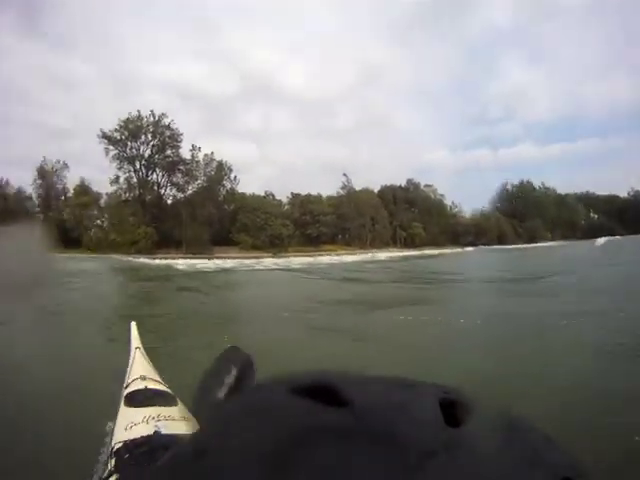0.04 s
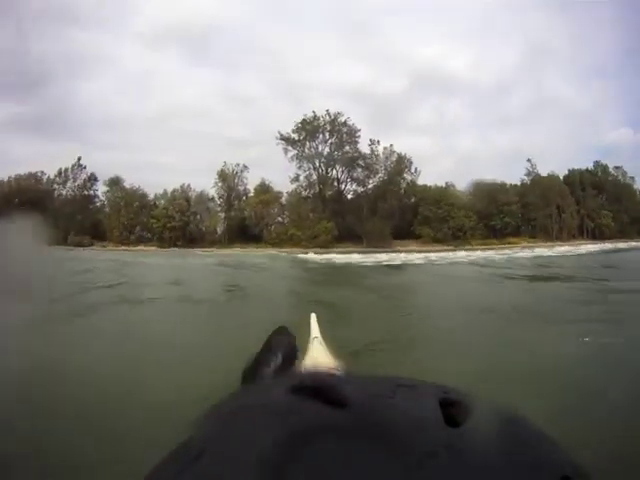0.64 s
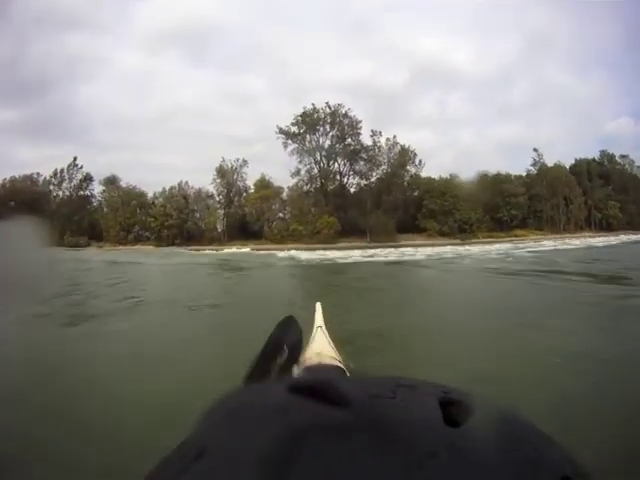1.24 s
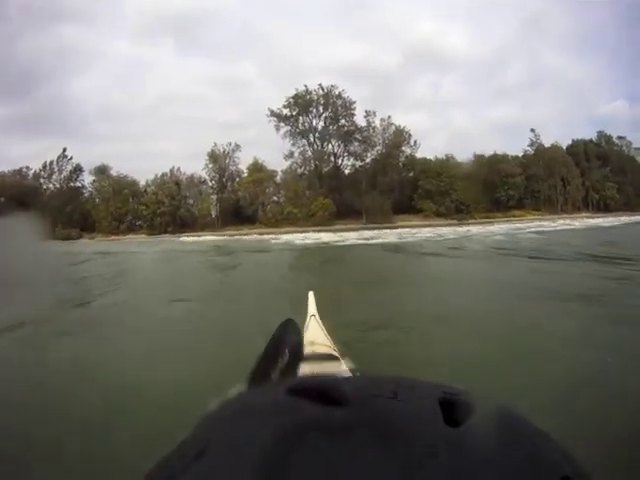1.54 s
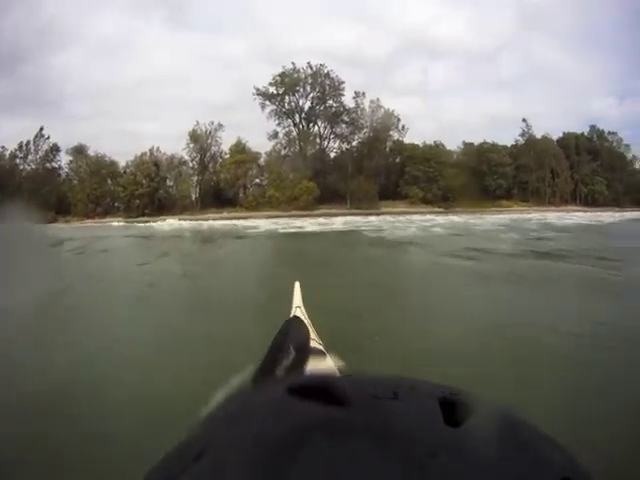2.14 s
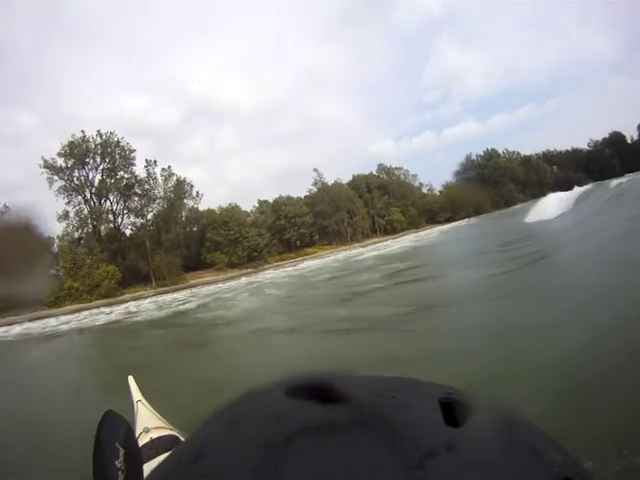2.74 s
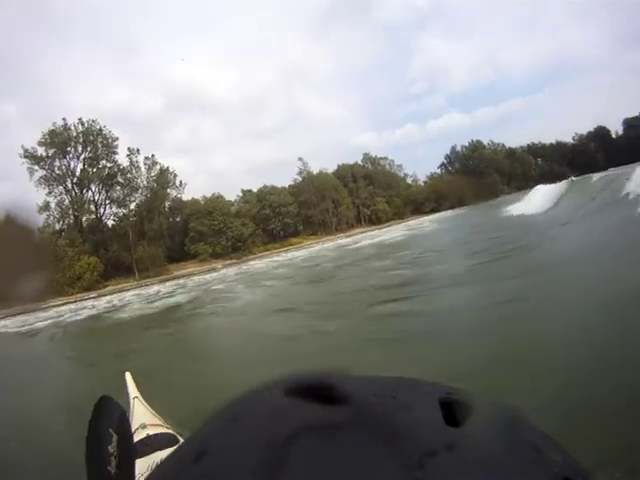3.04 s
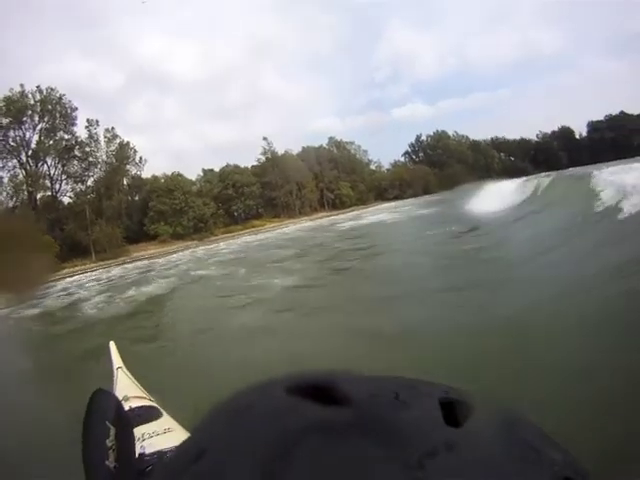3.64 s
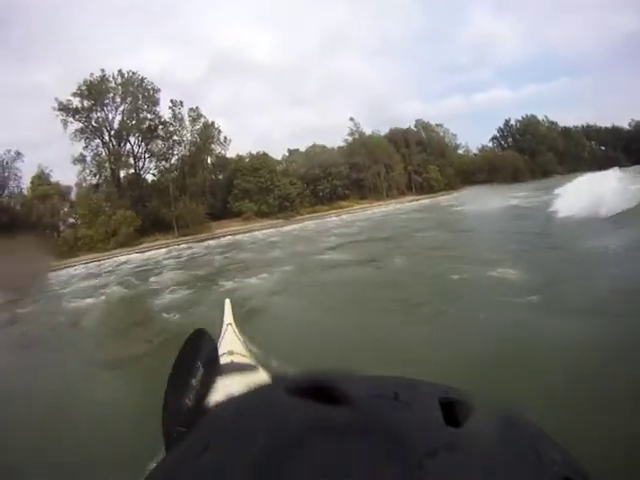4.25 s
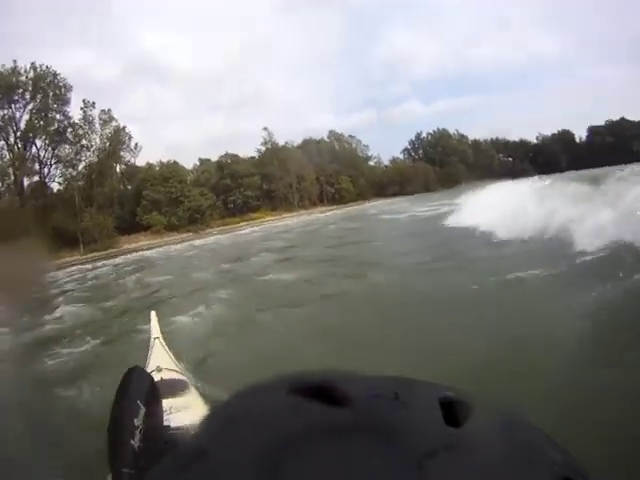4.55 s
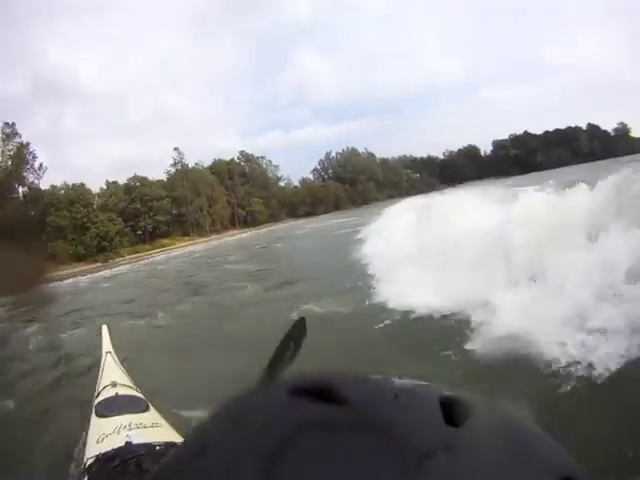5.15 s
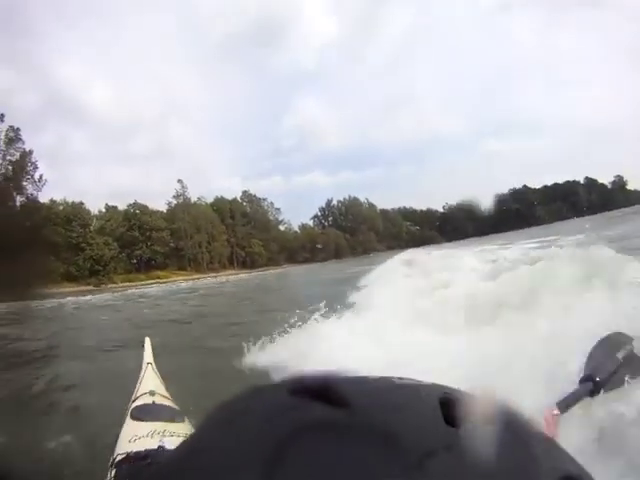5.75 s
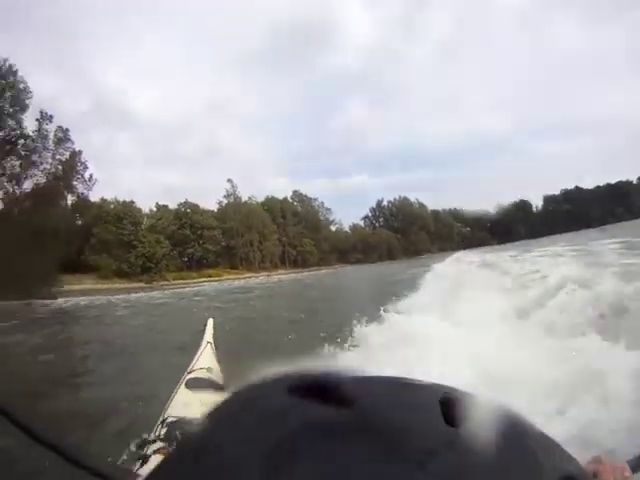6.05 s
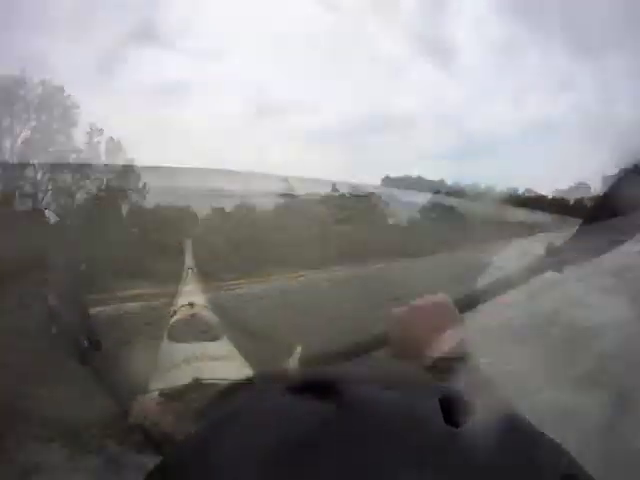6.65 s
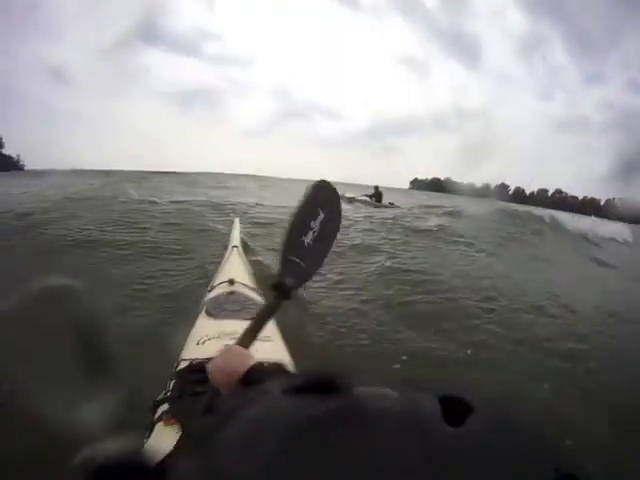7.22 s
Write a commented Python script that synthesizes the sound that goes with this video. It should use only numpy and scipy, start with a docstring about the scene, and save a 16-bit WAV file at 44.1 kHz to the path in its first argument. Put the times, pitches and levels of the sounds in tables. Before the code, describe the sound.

From a cased microphone on a paddler's helmet, lake water hisses and gurgles around a kayak while drops spatter on the shell and gear clacks lightly. The boxy, glassy rush swells steadily and is loudest as a wave breaks beside the boat. Low gusts thump the microphone and a hard knock follows, then the foam turns quieter and duller, with a few last splashes.

```python
"""Kayak surfing to a lake shore

A windy lake, a wave breaking alongside; the microphone rides in a waterproof case on the paddler's
helmet. Foam and spray rush through the resonances of the case, the breaker roars underneath and wind
buffets the mount. Right at the microphone, splashes patter on the shell and gear knocks a few times.
The camera samples coarsely and holds each value, mirroring it all into a thin, glassy treble."""
import sys
import numpy as np
from scipy import signal
from scipy.fft import rfft, irfft
from scipy.io import wavfile
from scipy.ndimage import uniform_filter1d

SR = 44100
rng = np.random.default_rng(int(sys.argv[2]) if len(sys.argv) > 2 else 0)


def persist_wave(psi):
    """Save psi, clipped to +-1, as 16-bit WAV."""
    counts = np.round(np.clip(psi, -1, 1) * 32767).astype(np.int16)
    wavfile.write(sys.argv[1], SR, np.atleast_2d(counts).T)


N = 321048
TIME = np.arange(N) / SR
FREQ = np.arange(N // 2 + 1) * SR / N

# what the case wall lets through to the microphone: frequency_hz, gain_db
CASE_WALL = [(100, -17), (180, -15.5), (400, -16), (750, -20), (1100, -16.5), (2000, -12), (3500, -14.5),
             (5300, -17.5), (6000, -26)]
# resonances and notches of the case: centre_hz, width_hz, gain_db
CASE_RESONANCES = [(949, 130, 8), (1205, 190, 7.5), (1497, 370, 4), (2250, 730, 14), (2243, 73, 1.5),
                   (2737, 71, 5.5), (2832, 210, -6.5), (3237, 120, 6), (3697, 370, 5.5), (4350, 310, -1.5),
                   (4990, 360, 4)]
# the wave builds, breaks alongside and drops behind; 0 dB is the steady ride: time_s, level_db
SURF_STRENGTH = [(0, -6), (.6, -5), (1.1, -4.5), (1.6, -5.5), (2.08, -6), (2.36, -3), (2.8, -0.6),
                 (3.35, .2), (3.75, -0.54), (4.5, 1), (5, 2.1), (5.32, 6), (5.44, 4), (5.6, 7.6),
                 (6.24, 5.5), (6.63, 1.7), (6.88, -4.5), (7.28, -2)]
# gusts on the case: peak_s, length_s, level_db
GUSTS = [(.3, 1, -55), (.84, 0.22, -50), (2.7, 1.0, -51), (3.42, .16, -50), (5.4, 0.38, -46),
         (5.78, 0.28, -43.5), (6.0, 0.28, -44), (6.3, 0.46, -38), (6.9, 0.29, -45.5), (7.2, 0.26, -44)]
# single eddies that shove the case as the wave passes: start_s, peak_db, length_s
BUFFETS = [(6.186, -32, 0.024), (6.282, -25, 0.019), (6.364, -33, 0.029)]
# water slopping against the boat: peak_s, length_s, level_db, pitch_hz
SLOSHES = [(.52, 0.12, -58, 320), (.8, 0.19, -56, 290), (1.04, 0.44, -48, 3800), (1.307, 0.14, -46, 1400),
           (2.594, .08, -56, 150), (2.687, 0.084, -55, 400), (5.36, 0.25, -37.5, 1140),
           (6.08, .36, -39.5, 1250), (7.143, 0.62, -53.5, 145)]
# knocks of the gear: start_s, clack_gain_db, thump_gain_db, contact_s
KNOCKS = [(0.3261, -20.5, -50, .003), (0.333, -36, -35.5, 0.0057), (0.354, -29, -40, 0.008),
          (.6545, -28, -40, 0.0052), (6.481, -28, -19.5, 0.0029)]
# modes of the hard shell: pitch_hz, relative_db, t60_s
SHELL_MODES = [(450, -15, .04), (1060, -11, 0.043), (1280, 4, .028), (1346, 14, 0.021), (1950, -5, .015)]
# modes of the springy mount: pitch_hz, relative_db, t60_s
MOUNT_MODES = [(50.6, 18.5, 0.15), (138, 6, 0.13), (216, -17, 0.05), (302, -11, 0.052), (520, -1.5, 0.11)]
# larger splashes landing on the case: start_s, peak_db, decay_s, brightness_db
SPLASHES = [(.044, -29, 0.0078, -1), (.166, -27.5, 0.0074, -16), (.789, -32, .005, -4),
            (.861, -27, 0.0065, 1), (1.509, -30, 0.011, 8), (2.2445, -25.5, .005, -14),
            (3.264, -27, .004, 10), (4.423, -22, 0.011, -3), (5.185, -27, .005, -8), (5.331, -22, 0.004, 2),
            (5.338, -18, 0.0054, -18), (5.682, -21, .0055, -6), (6.481, -23, .006, -11),
            (6.653, -30, .004, -10), (7.079, -27, 0.0096, -15), (7.123, -25.5, 0.01, -7),
            (7.229, -36, .008, -15)]
# sheets of spray sweeping over the case: peak_s, length_s, level_db
SPRAYS = [(0.856, .26, -43), (2.92, 0.55, -42.5), (4.42, 0.24, -40.5), (5.187, 0.41, -36),
          (7.102, 0.13, -42)]

# the paddler's head turns from the wave, shading its fizz and roar from the microphone
TURN_START_S, TURN_LENGTH_S, FIZZ_SHADE_DB, ROAR_SHADE_DB = 6.7, 0.31, -7.5, -2.5
# fine foam fizzes on after each sheet of spray; lag and level are relative to the sheet
AFTERFIZZ_LAG_S, AFTERFIZZ_S, AFTERFIZZ_DB = 0.19, 0.54, -8.5
CAMERA_RATE_HZ, TREBLE_LIMIT_HZ = 12000, 15280


def undb(db):
    """Decibels to gain."""
    return 10 ** (np.asarray(db) / 20)


def unit(x):
    """Scale to rms 1."""
    return x / np.sqrt(np.mean(x ** 2))


def add(out, start_s, sound):
    """Mix a short sound in at start_s."""
    start = max(int(start_s * SR), 0)
    out[start:start + len(sound)] += sound[:max(N - start, 0)]


def below(hz, order):
    """Share of the power that a low-pass lets through at each frequency."""
    return 1 / (1 + (FREQ / hz) ** (2 * order))


def shaped(x, response):
    """Filter by a frequency response."""
    return irfft(rfft(x) * response, N)


def ramp(start_s, length_s):
    """Rises from 0 to 1 over length_s."""
    return np.clip((TIME - start_s) / length_s, 0, 1)


def swell_power(rows):
    """Power of rounded swells that rise and die away around their peaks."""
    return sum((undb(db) * np.sin(np.pi * ramp(peak_s - length_s / 2, length_s))) ** 2
               for peak_s, length_s, db in rows)


def wander(rate_hz):
    """Glides to a new random value rate_hz times a second; rms 1."""
    hold = int(SR / rate_hz)
    steps = np.repeat(rng.standard_normal(N // hold + 1), hold)
    return unit(uniform_filter1d(steps, hold)[:N])


def follow_surf(ride_db, growth):
    """Gain that is ride_db on the steady ride and rises by growth dB per dB of surf."""
    surf_db = np.interp(TIME, *np.transpose(SURF_STRENGTH))
    return undb(ride_db + growth * surf_db)


def case_response():
    """The wall and resonances around the microphone, made causal so a drop rings after it lands."""
    wall_hz, wall_db = np.transpose(CASE_WALL)
    db = np.interp(np.log(FREQ + 1), np.log(wall_hz), wall_db)
    db += sum(gain / (1 + (2 * (FREQ - centre) / width) ** 2) for centre, width, gain in CASE_RESONANCES)
    cepstrum = irfft(np.log(undb(db)), N)
    causal_fold = 1 + np.sign(N / 2 - np.arange(N)) * (np.arange(N) > 0)
    return np.exp(rfft(cepstrum * causal_fold))


def bubble_bands():
    """Large bubbles gurgle below the main ring of the case, middling ones rush on it, fine ones fizz."""
    under_rush, under_fizz = below(1702, order=8), below(3206, order=12)
    gurgle = under_rush * (1 - below(770, order=8))
    rush = under_fizz * (1 - under_rush)
    return np.sqrt(gurgle), np.sqrt(rush), np.sqrt(1 - under_fizz)


def patter(per_s, spread_db):
    """Drops and bursting bubbles: clicks at random moments, many small and a few large."""
    sizes = undb(spread_db * np.minimum(rng.exponential(size=N), 4))
    hits = rng.random(N) < per_s / SR
    return unit(hits * sizes * rng.choice([-1, 1], N))


def foam(response, drop_share, per_s, spread_db, flicker_db):
    """Smooth hiss with a share of separate drops, flickering as the foam folds; rms 1."""
    drops = np.sqrt(drop_share) * patter(per_s, spread_db)
    hiss = np.sqrt(1 - drop_share) * rng.standard_normal(N)
    flicker = undb(flicker_db * wander(rate_hz=70))
    return unit(shaped((drops + hiss) * flicker, response))


def wind():
    """Eddies press on the case and rock it on its helmet mount."""
    power = follow_surf(ride_db=-53, growth=0.65) ** 2 + swell_power(GUSTS)
    mount_resonance = 1 + 1 / (1 + ((FREQ - 47.5) / 3.1) ** 2)
    band = below(51.5, order=5) * (1 - below(11.6, order=2))
    eddies = signal.hilbert(shaped(rng.standard_normal(N), mount_resonance * np.sqrt(band)))
    # the flow flutters quickly but keeps its strength from one moment to the next
    strength = np.sqrt(uniform_filter1d(np.abs(eddies) ** 2, SR // 3))
    out = unit(eddies.real / strength) * np.sqrt(power)
    for start_s, peak_db, length_s in BUFFETS:
        shove = np.sin(np.pi * TIME[:int(length_s * SR)] / length_s)
        add(out, start_s, undb(peak_db) * shove)
    return out


def hull():
    """Below the microphone, chop drums on the hollow boat, harder in broken water."""
    band = below(200, order=5) * (1 - below(115, order=4))
    drumming = unit(shaped(patter(per_s=280, spread_db=3), np.sqrt(band)))
    return drumming * follow_surf(ride_db=-61.5, growth=1.36)


def sloshes(case, width_octaves=0.58):
    """Down at the waterline, each slop traps a cloud of bubbles of about one size."""
    out = np.zeros(N)
    for peak_s, length_s, level_db, pitch_hz in SLOSHES:
        octaves_off = np.log2((FREQ + 1) / pitch_hz)
        band = np.exp(-(octaves_off / width_octaves) ** 2 / 2)
        bubbles = unit(shaped(patter(per_s=1500, spread_db=2), case * band))
        out += bubbles * np.sqrt(swell_power([(peak_s, length_s, level_db)]))
    return out


def breaker(case):
    """Beside the boat, clouds of large bubbles churn in the tumbling wave."""
    band = below(828, order=8) * (1 - below(60, order=3))
    churn = foam(case * np.sqrt(band), drop_share=0.27, per_s=380, spread_db=2, flicker_db=0.3)
    shade = undb(ROAR_SHADE_DB * ramp(TURN_START_S, TURN_LENGTH_S))
    return churn * shade * follow_surf(ride_db=-52, growth=0.99)


def struck(modes):
    """Fading modes after one blow; peak 1."""
    t = TIME[:SR // 2]
    ring = sum(undb(db - 60 * t / t60) * np.sin(2 * np.pi * hz * t) for hz, db, t60 in modes)
    return ring / np.abs(ring).max()


def knocks(flex_s=0.00019):
    """A blow clacks the shell around the microphone and shoves the mount, which springs back and swings."""
    out = np.zeros(N)
    clack, swing = struck(SHELL_MODES), struck(MOUNT_MODES)
    t = TIME[:len(clack)]
    clack *= 1 - np.exp(-t / flex_s)  # the shell flexes before it rings fully
    for start_s, clack_db, thump_db, contact_s in KNOCKS:
        shove = np.sin(np.pi * np.minimum(t / contact_s, 1))
        thump = swing - 1.3 * shove
        add(out, start_s, undb(clack_db) * clack + undb(thump_db) * thump)
    return out


def stray_drops(count, peak_db, decay_s):
    """Rows of small, equally strong splashes at random moments, each with its own brightness."""
    starts_s = rng.uniform(0, N / SR, count)
    brightness_db = rng.normal(-10, 5, count)
    return [(start_s, peak_db, decay_s, db) for start_s, db in zip(starts_s, brightness_db)]


def splashes(case):
    """Right at the microphone, each splash is a brief spatter ringing the case; finer drops are brighter."""
    out = np.zeros(N)
    size, lead = 2048, 128  # samples
    low, middle, high = (irfft(case * band, N)[np.arange(size) - lead] for band in bubble_bands())
    drops = stray_drops(count=22, peak_db=-35.5, decay_s=0.0057)
    for start_s, peak_db, decay_s, brightness_db in drops + list(SPLASHES):
        force = 0.79 * rng.standard_normal(size) * np.exp(-TIME[:size] / decay_s)
        force[0] += 2  # the first impact
        ring = 0.34 * low + middle + undb(brightness_db) * high
        splash = signal.fftconvolve(force, ring)
        add(out, start_s - lead / SR, undb(peak_db) * splash / np.abs(splash).max())
    return out


def whitewater(case):
    """Close by, bubbles of three sizes surge together; spray adds to the rush, then fizzes out."""
    low, middle, high = bubble_bands()
    gurgle = foam(case * low, drop_share=0.17, per_s=900, spread_db=3.5, flicker_db=0.5)
    rush = foam(case * middle, drop_share=0.17, per_s=900, spread_db=0.5, flicker_db=0.52)
    fizz = foam(case * high, drop_share=0.19, per_s=1200, spread_db=3.5, flicker_db=0.5)
    afterfizz = [(peak_s + AFTERFIZZ_LAG_S, AFTERFIZZ_S, db + AFTERFIZZ_DB) for peak_s, _, db in SPRAYS]
    gurgle *= follow_surf(ride_db=-44, growth=1.17)
    rush *= np.sqrt(follow_surf(ride_db=-38, growth=0.99) ** 2 + swell_power(SPRAYS))
    fizz *= np.sqrt(follow_surf(ride_db=-43.5, growth=1.05) ** 2 + swell_power(afterfizz))
    shade = undb(FIZZ_SHADE_DB * ramp(TURN_START_S, TURN_LENGTH_S))
    surge = undb(0.23 * wander(rate_hz=22))
    return (gurgle + rush + fizz * shade) * surge


def scene():
    """Water, wind and knocks at the one helmet microphone."""
    case = case_response()
    ride = whitewater(case) + breaker(case) + hull() + wind()
    events = splashes(case) + knocks() + sloshes(case)
    return (ride + events)[None]


def record(dry):
    """The camera holds each coarse sample, mirroring the sound around that rate, and cuts the top."""
    coarse = signal.resample(dry, round(N * CAMERA_RATE_HZ / SR), axis=1)
    held = signal.resample(np.repeat(coarse, 4, axis=1), N, axis=1)
    treble_cut = signal.ellip(14, 0.1, 80, TREBLE_LIMIT_HZ, fs=SR, output="sos")
    return signal.sosfilt(treble_cut, held)


dry = scene()
out = record(dry)
persist_wave(out)
```